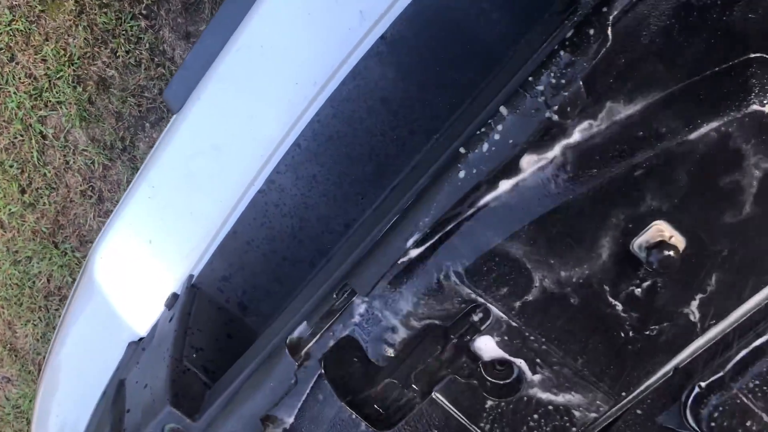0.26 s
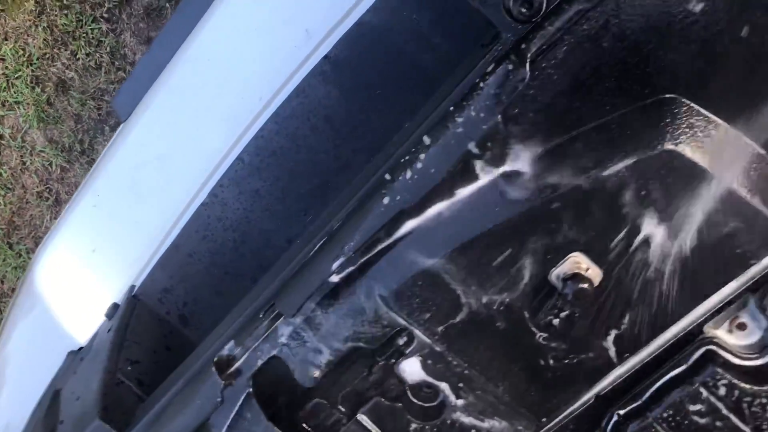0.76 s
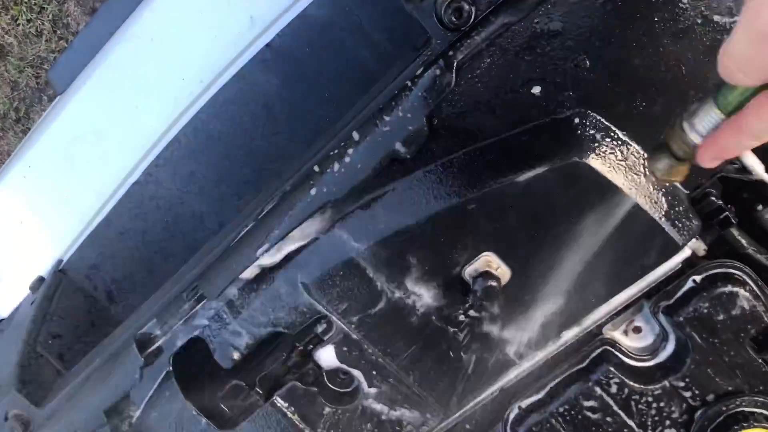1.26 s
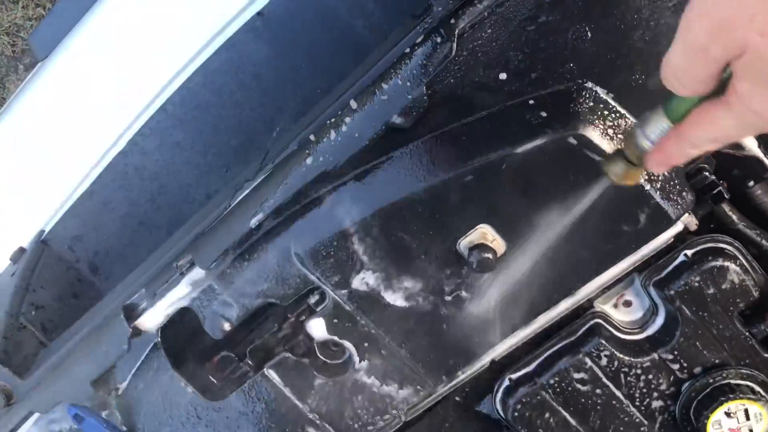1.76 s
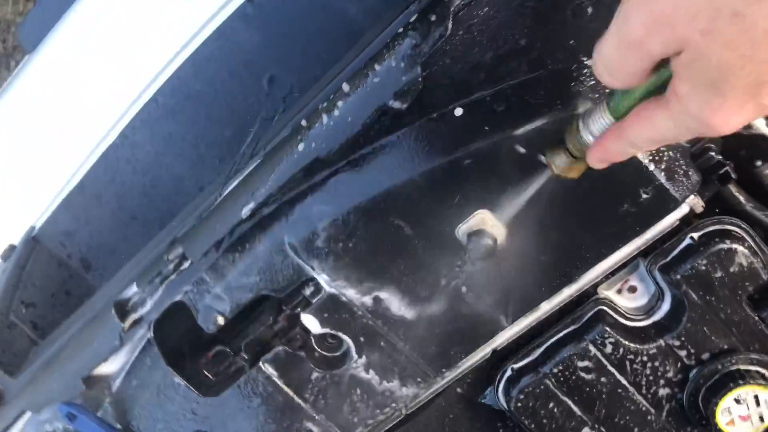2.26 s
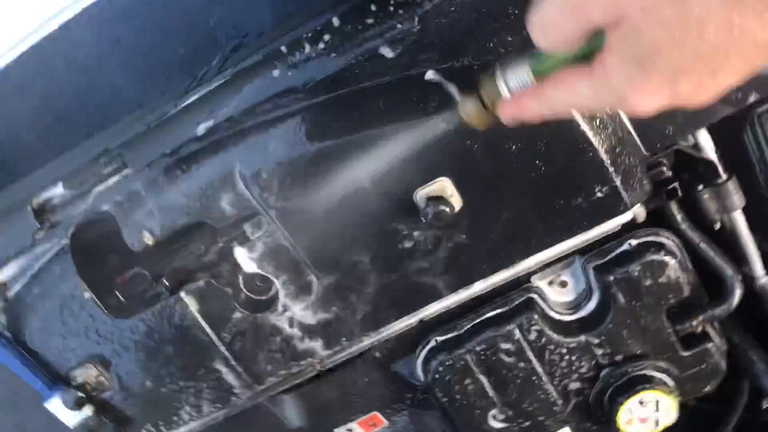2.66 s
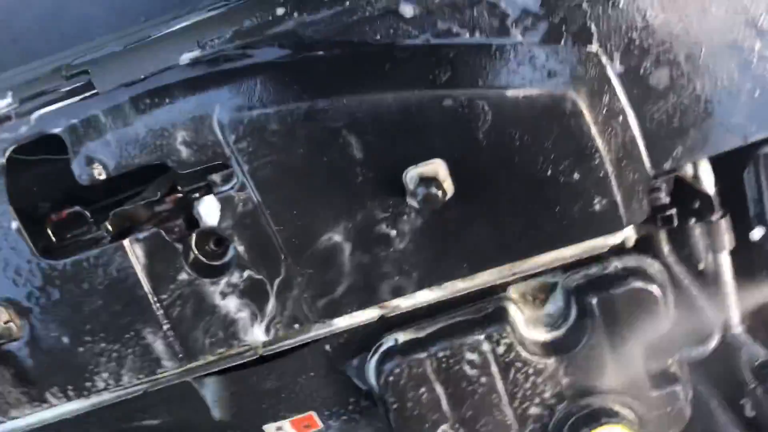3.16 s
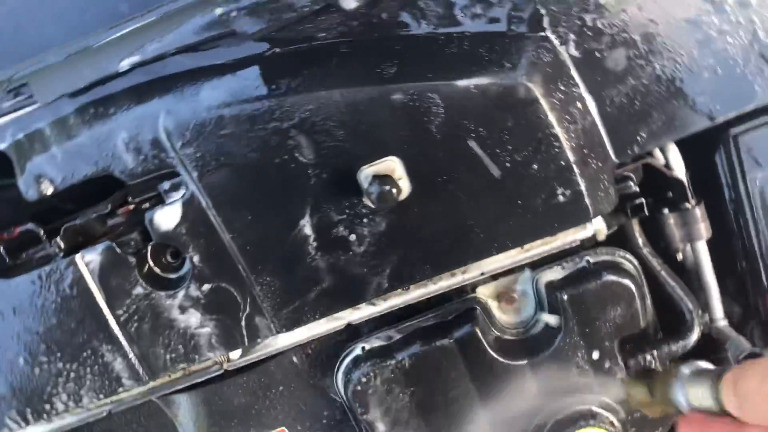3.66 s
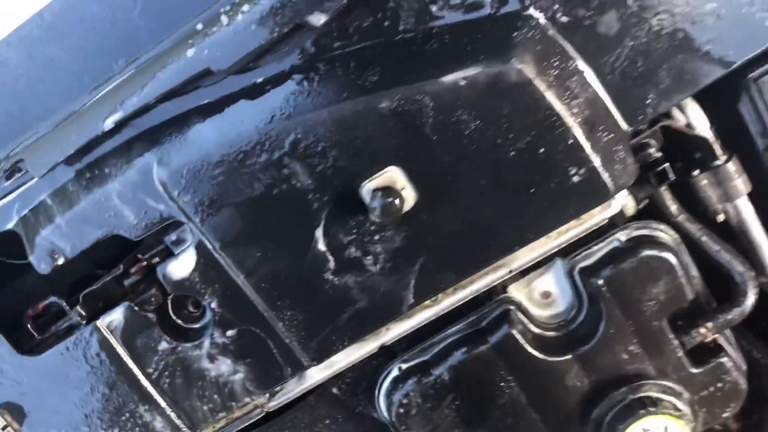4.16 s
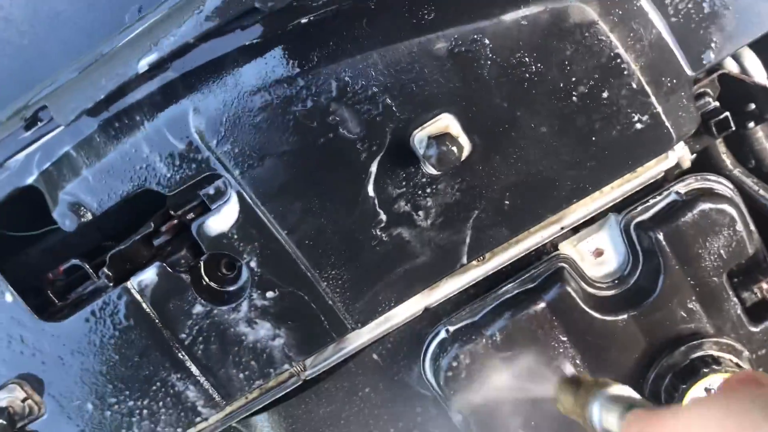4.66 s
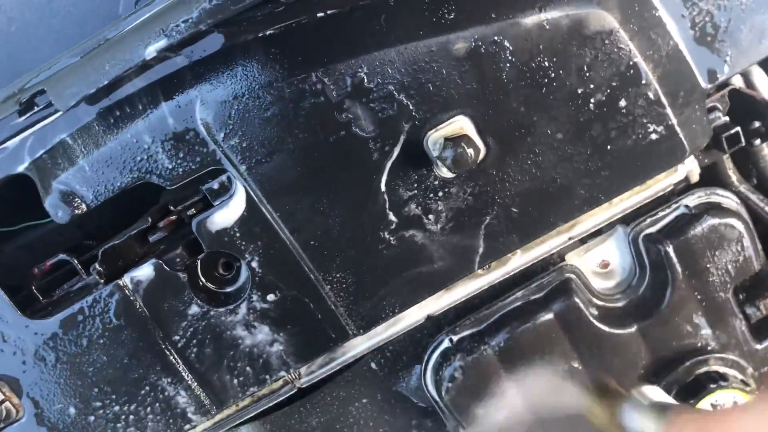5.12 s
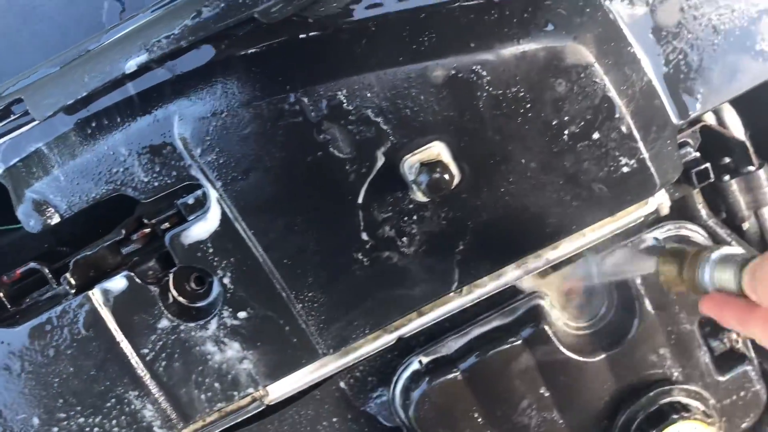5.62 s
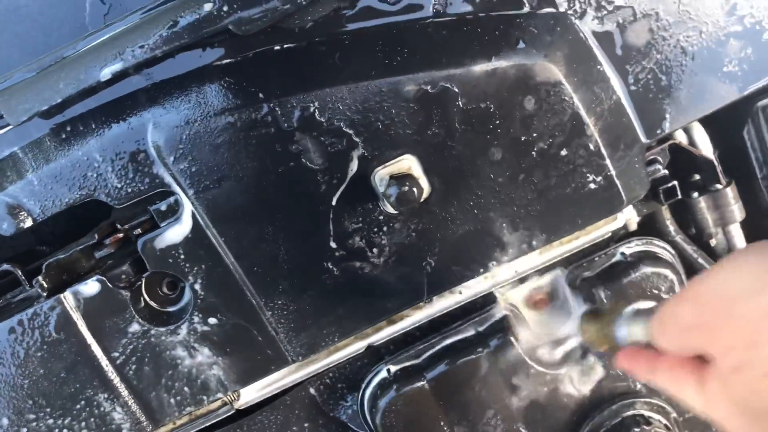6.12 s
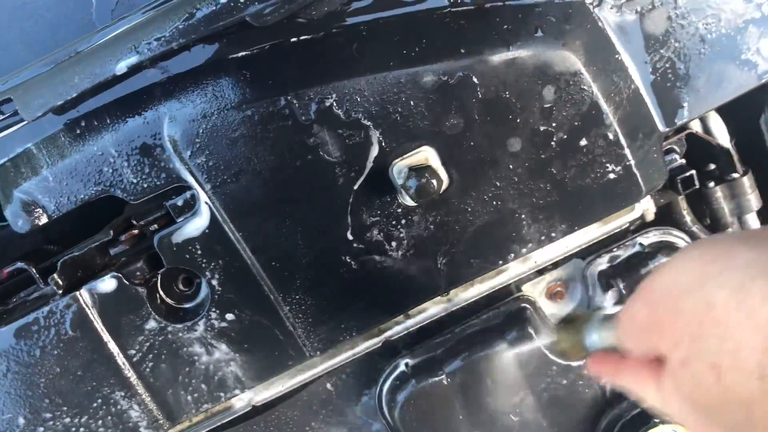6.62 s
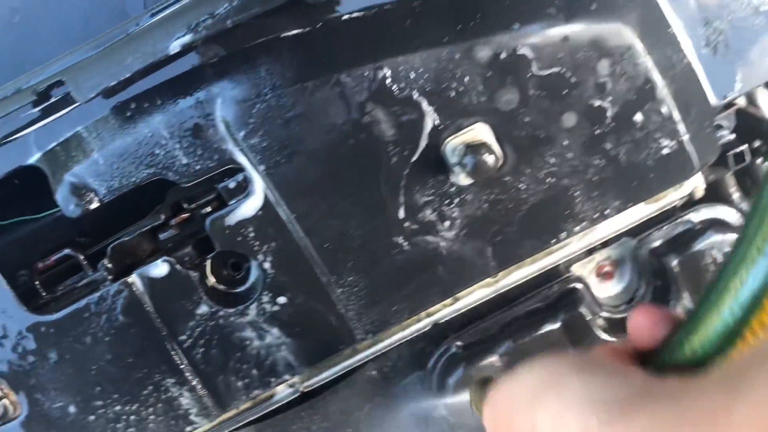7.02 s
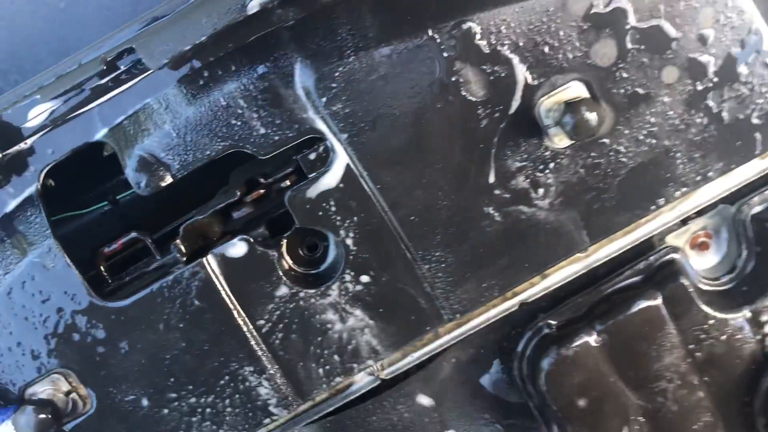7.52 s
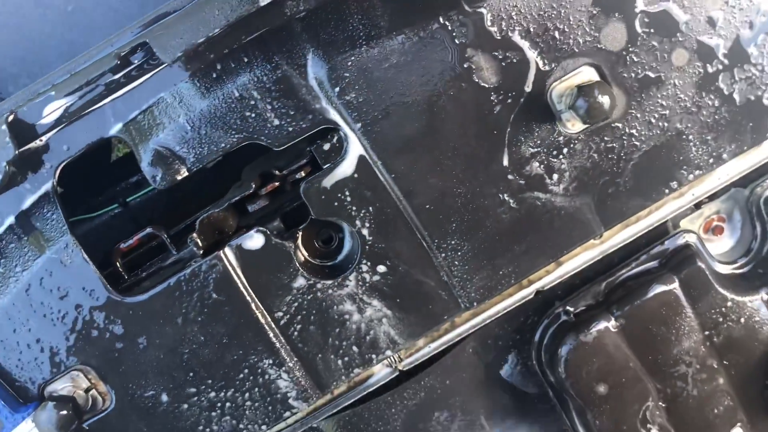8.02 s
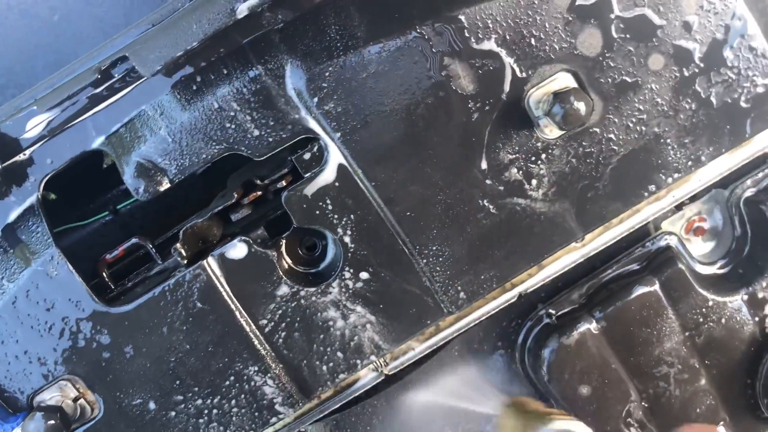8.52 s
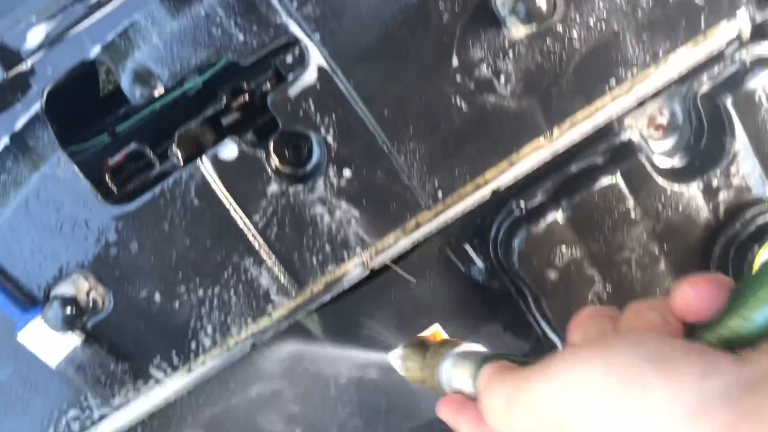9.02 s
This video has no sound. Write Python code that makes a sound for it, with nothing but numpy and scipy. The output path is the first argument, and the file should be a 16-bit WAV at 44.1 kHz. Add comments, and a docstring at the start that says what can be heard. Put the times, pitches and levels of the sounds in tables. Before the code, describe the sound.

A garden hose nozzle sprays with a steady hiss, water pattering and spattering on plastic engine parts, with a couple of hollow bumps.

```python
"""A garden hose rinses a car's engine bay outdoors, close to a mono microphone.
The nozzle's mist hisses, and a narrow high sizzle wavers above it. The drops drum on a plastic cover,
spatter on ribs and bolts, then reach deeper, hollow parts that ring; near panels throw the water's sound
back. A hollow plastic housing is bumped twice hard and twice lightly, over a low outdoor rumble."""
import sys
import numpy as np
from scipy import signal
from scipy.fft import rfft, irfft, next_fast_len
from scipy.io import wavfile
from scipy.ndimage import uniform_filter1d, map_coordinates

SR = 44100
rng = np.random.default_rng(int(sys.argv[2]) if len(sys.argv) > 2 else 0)


def put_to_file(sound):
    """Save the sound as 16-bit audio at rate SR, in the file named by the first command-line argument."""
    columns = np.atleast_2d(sound).T  # one column per channel
    safe = np.clip(columns, -1, 1)
    whole_steps = np.round(safe * 32767)
    wavfile.write(sys.argv[1], SR, whole_steps.astype(np.int16))


N = 409248

# the jet as the hand moves it, relative levels of mist and landing drops: time_s, hiss_db, force_db
JET_LEVELS = [(0, -44, -45.5), (2.0, -43.5, -46.5), (3.3, -41.5, -46.5), (4.15, -40, -45.5),
              (4.65, -41.5, -44), (5.2, -40, -44), (6.1, -38, -46), (6.48, -39.5, -47), (6.6, -40.5, -49.5),
              (7.29, -41, -47), (7.33, -37, -40), (7.7, -37, -39.5), (8.5, -37.8, -40.5),
              (8.8, -39.5, -42.5), (8.96, -37, -40.5), (9.28, -39.3, -43.5)]


def amp(db):
    return 10 ** (np.asarray(db) / 20)


def unit(x):
    return x / np.sqrt(np.mean(x ** 2) + 1e-20)


def curves(rows):
    """One value per sample for each column after the time."""
    time_s, *columns = np.transpose(rows)
    return [np.interp(np.arange(N) / SR, time_s, column) for column in columns]


def wobble(knots_per_s):
    """A smooth random curve."""
    return map_coordinates(rng.standard_normal(2048), [np.arange(N) * knots_per_s / SR], mode="wrap")


def swell(peak_s, rise_s, fall_s):
    """A gain that climbs to 1 at peak_s and falls away again."""
    dt = np.arange(N) / SR - peak_s
    distance = np.maximum(-dt / rise_s, dt / fall_s)
    return np.exp(-np.minimum(distance, 10) ** 2.98)  # squarer than a bell curve


def filtered(x, response):
    """x times a complex response of frequency."""
    size = next_fast_len(len(x) + SR // 2)
    return irfft(rfft(x, size) * response(np.fft.rfftfreq(size, 1 / SR)), size)[:len(x)]


def coloured(x, spectrum):
    """x shaped by (frequency_hz, level_db) points on a log axis, at rms 1."""
    points_hz, db = np.transpose(spectrum)
    return unit(filtered(x, lambda hz: amp(np.interp(np.log(hz + 1), np.log(points_hz), db))))


def resonated(x, modes):
    """x ringing through (pitch_hz, width_hz, level_db) resonances, at rms 1."""
    def response(hz):
        return sum(amp(db) * 1j * hz * width / (pitch * pitch - hz * hz + 1j * hz * width)
                   for pitch, width, db in modes)
    return unit(filtered(x, response))


def drops(per_second, clump_db, clump_rate):
    """Tiny impacts at random times; the jet breaks up into clumps."""
    sizes = rng.standard_normal(N) * amp(clump_db * wobble(clump_rate))
    return unit(sizes * (rng.random(N) < per_second / SR))


def patchy(x, depth_db):
    """The colour drifts as the jet wanders over uneven surfaces."""
    spectra = signal.stft(x, nperseg=512)[2]
    patches = uniform_filter1d(rng.standard_normal(spectra.shape), size=6, axis=0)
    patches = uniform_filter1d(patches, size=16, axis=1)
    return signal.istft(spectra * amp(depth_db * unit(patches)), nperseg=512)[1][:N]


def glancing(x, delay_s, sway, strength):
    """x plus its bounce off a wet surface: the path changes as the hand sways, so notches sweep."""
    lag = delay_s * SR * np.exp(sway * wobble(3.5))
    return unit(x + strength * map_coordinates(x, [np.arange(N) - lag], order=3))


def engine_bay(x, wet_db, t60_s):
    """Close panels throw a short cluster of dull reflections back to the microphone."""
    t = np.arange(SR // 20) / SR
    echoes = rng.standard_normal(len(t)) * (rng.random(len(t)) < .04)
    echoes *= (t > .002) * amp(-60 * t / t60_s)
    wet = signal.fftconvolve(x, echoes / np.linalg.norm(echoes))[:N]
    return x + amp(wet_db) * filtered(wet, lambda hz: 1 / (1 + (hz / 5500) ** 2))


def rumble():
    """Low outdoor background around the car, swelling now and then."""
    # the background's colour: frequency_hz, level_db
    spectrum = [(20, -44), (32, -31), (45, -10.5), (56, 2.5), (72, -3), (100, -2), (120, 1), (145, -9.5),
                (220, -16), (500, -34), (2000, -70)]
    # its swells: peak_s, half_length_s, level_db
    surges = [(2.193, 0.044, -51), (4.262, .09, -56.5), (8.278, 0.13, -52.5)]
    gain = amp(-52 + 0.5 * wobble(7)) + sum(amp(db) * swell(s, half, half) for s, half, db in surges)
    return gain * coloured(rng.standard_normal(N), spectrum)


def bumps():
    """Soft blows on hollow plastic: a light first touch, a dull scuff, then the modes die away."""
    # blows on the housing: start_s, relative_db, scuff_cutoff_hz
    blows = [(2.335, -42, 800), (4.412, -32.5, 900), (5.305, -43.5, 600), (7.105, -20, 700)]
    # the struck housing's modes: pitch_hz, level_db, t60_s
    modes = [(115.6, -12, 0.25), (180, -9.5, 0.15), (288, 2, 0.13), (358, -1, 0.15), (450, -4, 0.082),
             (590, -2, 0.055), (679, -6, 0.073), (900, -14, 0.08)]
    touch_spectrum = [(600, -13), (1400, -2), (1800, -4), (3000, -27), (8000, -60)]
    touch_t60_s, scuff_t60_s, attack_s = 0.12, 0.075, 0.0035
    out, t = np.zeros(N + SR), np.arange(SR // 2) / SR
    for start_s, db, cutoff_hz in blows:
        touch = coloured(rng.standard_normal(len(t)), touch_spectrum)
        ring = np.zeros(len(t))
        for pitch_hz, level_db, t60_s in modes:
            decay = amp(level_db + rng.normal(0, 2.2) - 60 * t / t60_s)
            ring += decay * np.sin(2 * np.pi * (pitch_hz * t + rng.random()))
        noise = rng.standard_normal(len(t))
        scuff = unit(filtered(noise, lambda hz: hz / (hz + 220) / (1 + (hz / cutoff_hz) ** 3)))
        blow = ring * (1 - np.exp(-t / attack_s)) + 0.5 * scuff * amp(-60 * t / scuff_t60_s)
        out[round((start_s - .003) * SR):][:len(t)] += amp(db - 17.0 - 60 * t / touch_t60_s) * touch
        out[round(start_s * SR):][:len(t)] += amp(db - 2.5) * blow
    return out[:N]


def engine_parts():
    """Down in the bay the deeper parts ring under the drops and the hollow housing drones."""
    # the jet reaches down between the parts: time_s, relative_db
    reach = [(7.27, -80), (7.33, -62), (7.6, -41), (8.4, -44), (8.8, -49), (9.28, -42.5)]
    # the jet passes near the housing: peak_s, rise_s, fall_s, level_db
    passes = [(2.9, 1.33, 0.38, -63.5), (6.38, .07, 0.19, -53.5), (7.25, 0.093, 0.074, -48.5),
              (7.4, 2.03, 2.05, -56)]
    # resonances of the parts and of the housing: pitch_hz, width_hz, level_db
    part_modes = [(1285, 16, -1.5), (1523, 27, 1), (1755, 180, -6), (2212, 36, -0.5), (3026, 130, -7.5),
                  (4070, 99, -18), (5250, 94, -4), (6130, 230, -9)]
    housing_modes = [(279, 25, 1.5), (358, 20, -11), (442, 63, -31), (650, 31, -23)]
    reach_db, = curves(reach)
    housing_gain = sum(amp(db) * swell(s, rise_s, fall_s) for s, rise_s, fall_s, db in passes)
    parts = resonated(patchy(drops(9000, clump_db=0.5, clump_rate=90), depth_db=3.0), part_modes)
    housing = resonated(drops(3000, clump_db=-0.6, clump_rate=36), housing_modes)
    return amp(reach_db + 1.5) * parts + housing_gain * housing


def spatters():
    """On an edge the jet bursts into coarse spray and rattles the part; small ridges add faint bursts."""
    # the jet catches a rib or a bolt: peak_s, rise_s, fall_s, spray_db, rattle_db
    catches = [(0.085, .02, .02, -34, -60), (0.865, 0.021, .025, -34.5, -54), (1.12, .015, .02, -39, -52),
               (3.18, .062, 0.022, -28, -39), (3.405, 0.024, 0.075, -28.5, -38),
               (3.655, 0.04, 0.027, -33, -47), (3.705, 0.021, 0.023, -33.5, -47),
               (5.25, .025, 0.033, -38, -52), (5.43, 0.027, 0.027, -26.5, -34.5),
               (5.49, 0.02, 0.0093, -24, -53), (5.57, .02, .025, -32, -46), (5.69, 0.024, 0.045, -31, -54),
               (5.8, 0.027, 0.05, -29, -36.5), (5.934, 0.018, .038, -35, -37),
               (6.082, 0.016, 0.045, -27, -33.5), (6.165, .02, .035, -31, -41),
               (6.303, 0.012, 0.0086, -33, -41)]
    # colours of the spray and of the rattling part: frequency_hz, level_db
    spray_spectrum = [(1200, -29), (4900, -32), (5700, -7), (7700, -3), (9100, -2), (10400, -7.5),
                      (11200, 0.5), (15700, -2)]
    rattle_spectrum = [(700, -28), (1500, -9.5), (2000, -11.5), (2550, -1.5), (3100, -6.5), (3700, 0.5),
                       (4300, -2), (4900, -3), (5700, 1), (8000, -17), (14000, -38)]
    ridges_per_s, ridge_max_db, ridge_half_s = 4.2, -40, 0.023
    spray_gain, rattle_gain = np.zeros(N), np.zeros(N)
    for peak_s, rise_s, fall_s, spray_db, rattle_db in catches:
        contact = swell(peak_s, rise_s, fall_s)
        spray_gain += amp(spray_db) * contact
        rattle_gain += amp(rattle_db) * contact
    for when, size in rng.random((int(ridges_per_s * N / SR), 2)):
        spray_gain += amp(ridge_max_db) * size * swell(when * N / SR, ridge_half_s, ridge_half_s)
    spray = coloured(patchy(drops(15000, clump_db=1.5, clump_rate=430), depth_db=1.5), spray_spectrum)
    rattle = coloured(patchy(drops(7000, clump_db=0.2, clump_rate=300), depth_db=0.1), rattle_spectrum)
    return spray_gain * spray + rattle_gain * rattle


def cover():
    """Drops patter on stiff surfaces; on the thin cover they also drum and splash in the water film."""
    # the wet cover's response, relative to the force of the drops: time_s, drum_db, film_db
    response = [(0, -5, -10), (0.55, -3, -7), (1.9, -9, -8.5), (3.05, -4.5, -5.5), (3.35, -6.5, -12),
                (3.85, -5, -8.5), (4.15, -7.5, -12.5), (6.1, -8, -12), (6.4, -4, -8), (6.7, -7, -13.5),
                (7.2, -4, -4), (7.4, -11, -18), (8.1, -8.5, -17), (9.28, -7, -17)]
    # colours of the drumming cover, the patter and the water film: frequency_hz, level_db
    drum_spectrum = [(450, -36), (830, -13.5), (960, 0.5), (1090, -0.5), (1200, -3), (1400, -3.5),
                     (1700, -14), (2500, -21.5)]
    patter_spectrum = [(900, -30), (1400, -3), (1600, -2.5), (1950, -3.5), (2450, -1.5), (3200, -3),
                       (4300, -3), (4900, -5), (5500, -4.5), (6400, -7), (9000, -10.5), (16000, -40)]
    film_spectrum = [(100, -8.5), (200, -7), (300, -3), (385, -1.5), (480, -4), (590, 0.5), (820, -5),
                     (1200, -13), (2500, -24.5)]
    _, force_db = curves(JET_LEVELS)
    drum_db, film_db = curves(response)
    drum = coloured(patchy(drops(7000, clump_db=-0.55, clump_rate=160), depth_db=1.3), drum_spectrum)
    patter = coloured(patchy(drops(14000, clump_db=0.13, clump_rate=180), depth_db=1.94), patter_spectrum)
    film = coloured(patchy(drops(3000, clump_db=-0.4, clump_rate=40), depth_db=2.5), film_spectrum)
    return amp(force_db) * (amp(1.6) * patter + amp(drum_db) * drum + amp(film_db) * film)


def nozzle():
    """Fine mist hisses; a narrow sizzle near 11 kHz wavers above the hiss and sinks as it flares."""
    # colours of the mist, the unshifted sizzle and the sizzle's low cut: frequency_hz, level_db
    mist_spectrum = [(900, -28), (2500, -17.5), (4900, -12.5), (5600, -5.5), (6500, -3), (7650, -5.5),
                     (9300, -1), (9900, -2), (10400, -2), (11000, 1), (12500, 0), (14000, -0.5),
                     (15700, -2)]
    sizzle_spectrum = [(10300, -38.5), (10900, -9), (11250, 0.5), (11600, -9), (12050, -4), (13000, -13),
                       (15000, -10)]
    low_cut = [(10450, -18), (10850, -2)]
    # the sizzle flares up: peak_s, half_length_s, level_db
    flares = [(0.36, 0.049, -42), (0.622, 0.032, -45), (1.155, 0.053, -41), (2.57, .13, -46),
              (4.334, .12, -45), (5.87, .09, -42), (8.839, 0.071, -42.5), (9.17, 0.038, -38.5)]
    resting_db, swing_db, wander_hz, sag_hz_per_db = -43.5, 3, 250.4, 35
    hiss_db, _ = curves(JET_LEVELS)
    mist = coloured(patchy(drops(40000, clump_db=-0.5, clump_rate=700), depth_db=1.5), mist_spectrum)
    mist = glancing(mist, delay_s=0.000599, sway=0.239, strength=0.19)  # off the part being sprayed
    mist = glancing(mist, delay_s=.0025, sway=0.053, strength=0.29)  # off a farther panel
    sizzle_gain = amp(resting_db + swing_db * wobble(12))
    sizzle_gain += sum(amp(db) * swell(s, half, half) for s, half, db in flares)
    sag_hz = sag_hz_per_db * (20 * np.log10(sizzle_gain) - resting_db)
    shift_hz = 140 + wander_hz * wobble(9) + 90 * wobble(24) - sag_hz
    band = signal.hilbert(coloured(rng.standard_normal(N), sizzle_spectrum))
    shifted = np.real(band * np.exp(2j * np.pi * np.cumsum(shift_hz) / SR))
    sizzle = glancing(coloured(shifted, low_cut), delay_s=0.00082, sway=0.115, strength=0.45)
    flutter_db = 0.55 * wobble(30) + 0.55 * wobble(130)
    mist_gain = amp(hiss_db + 5.0 + 0.25 * wobble(11))
    return amp(flutter_db) * (mist_gain * mist + sizzle_gain * sizzle)


def scene():
    """One microphone close to the engine bay, the same on both channels."""
    water = engine_bay(nozzle() + cover() + spatters(), wet_db=-13.0, t60_s=0.053)
    mono = water + engine_parts() + bumps() + rumble()
    return np.array([mono, mono])


def record(dry):
    """The recorder keeps nothing above its band limit."""
    return np.array([filtered(channel, lambda hz: hz < 15800) for channel in dry])


dry = scene()
out = record(dry)
put_to_file(out)
```